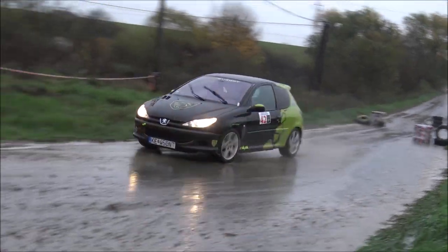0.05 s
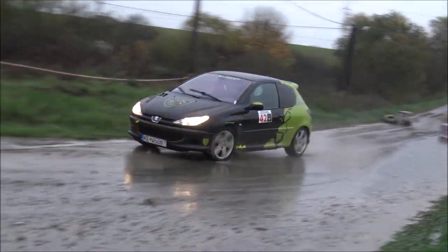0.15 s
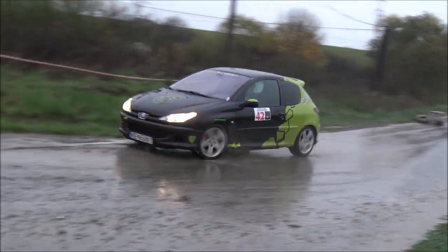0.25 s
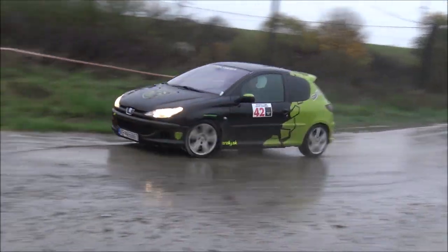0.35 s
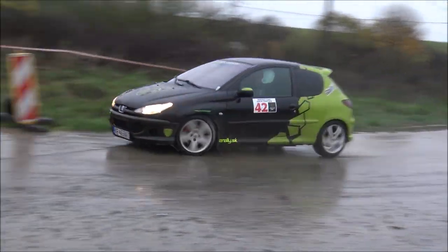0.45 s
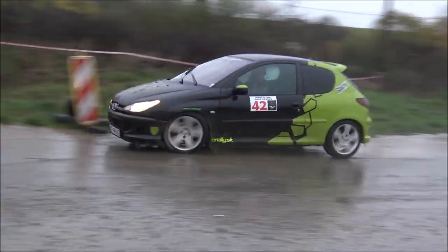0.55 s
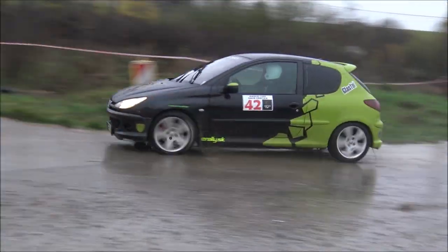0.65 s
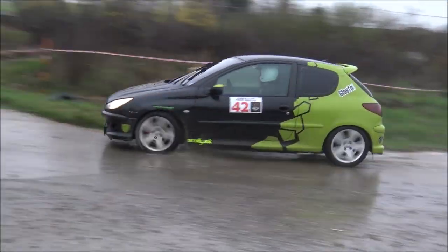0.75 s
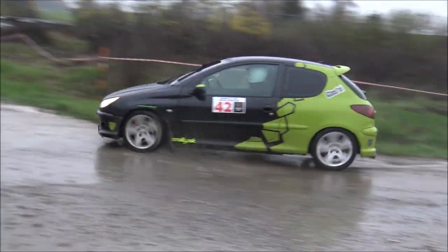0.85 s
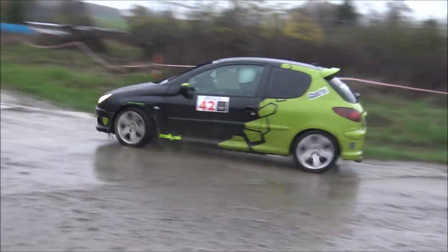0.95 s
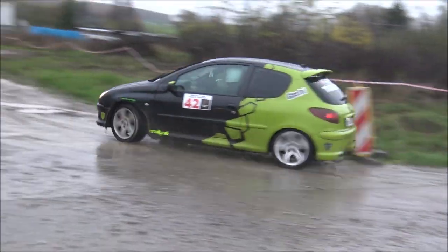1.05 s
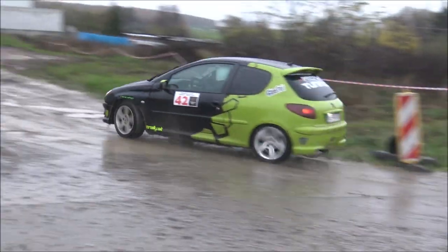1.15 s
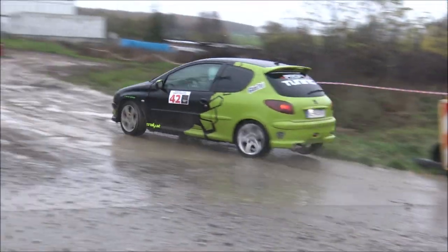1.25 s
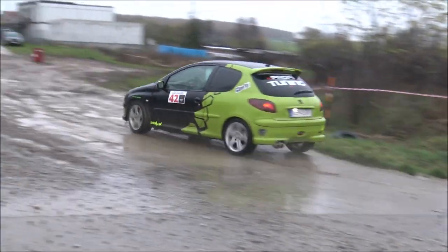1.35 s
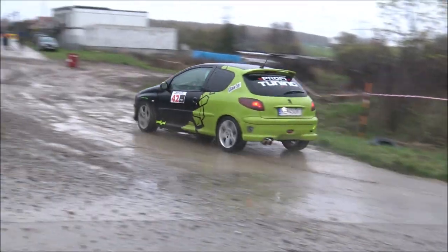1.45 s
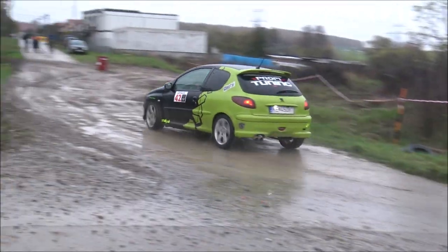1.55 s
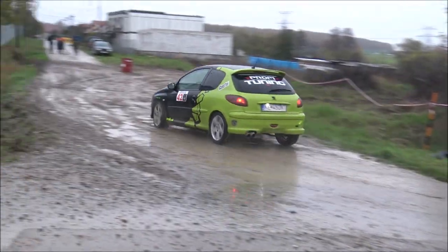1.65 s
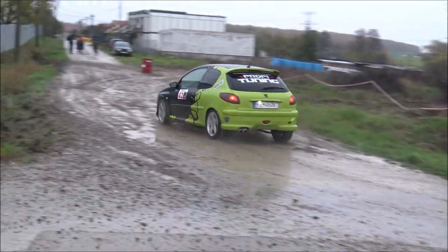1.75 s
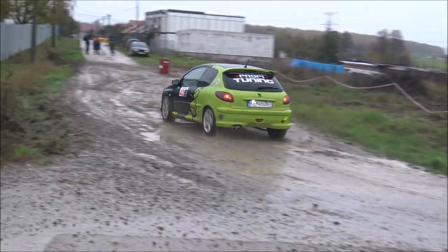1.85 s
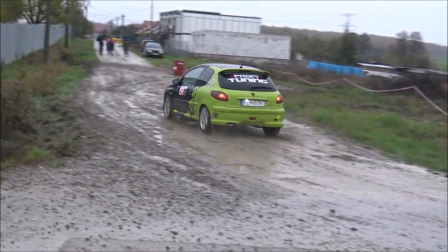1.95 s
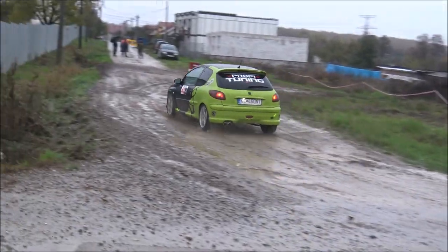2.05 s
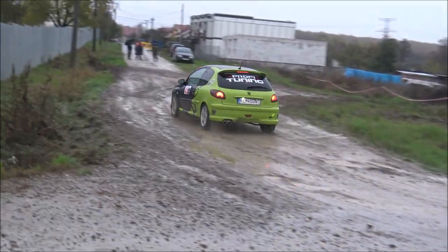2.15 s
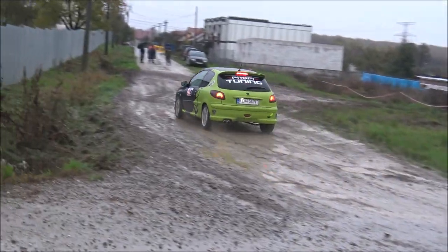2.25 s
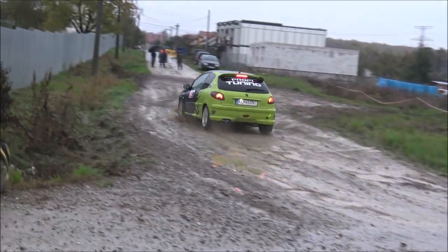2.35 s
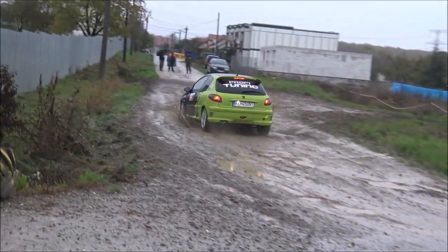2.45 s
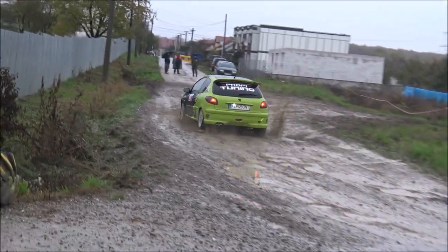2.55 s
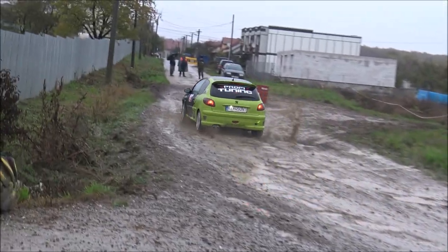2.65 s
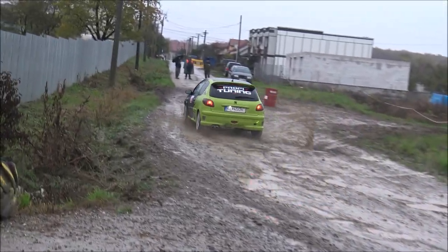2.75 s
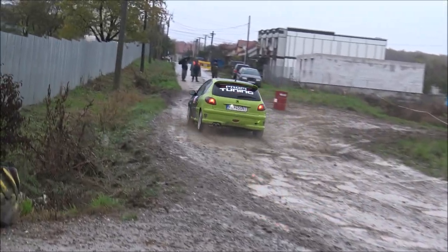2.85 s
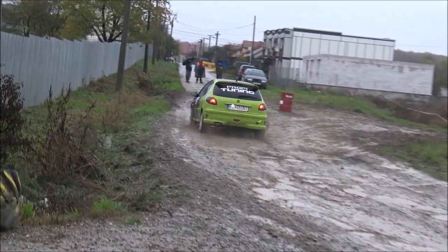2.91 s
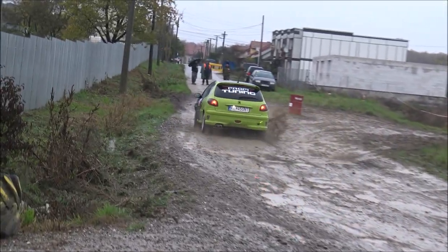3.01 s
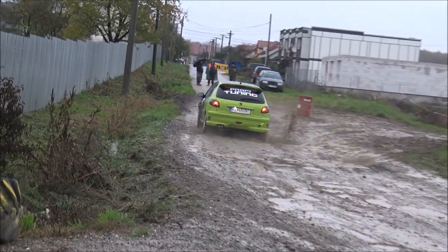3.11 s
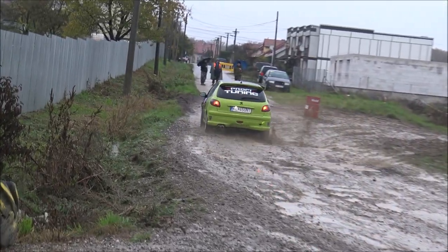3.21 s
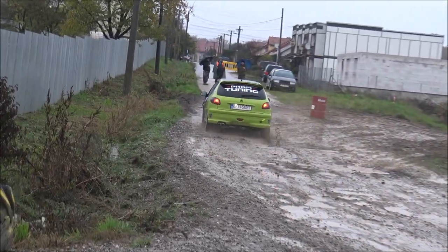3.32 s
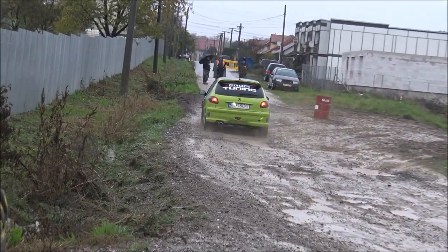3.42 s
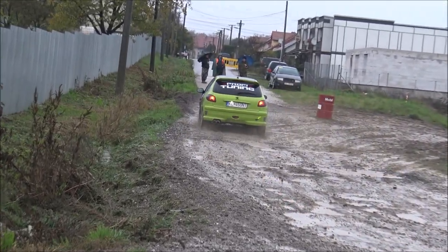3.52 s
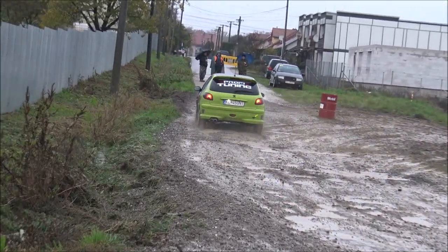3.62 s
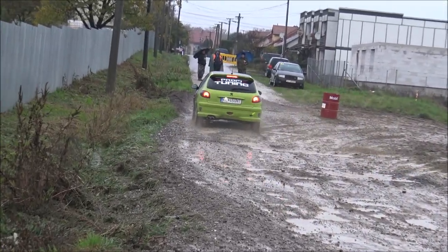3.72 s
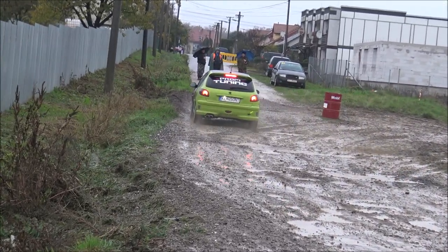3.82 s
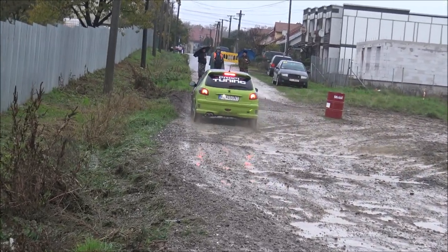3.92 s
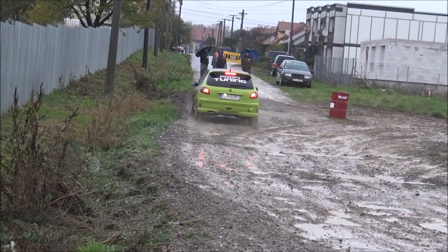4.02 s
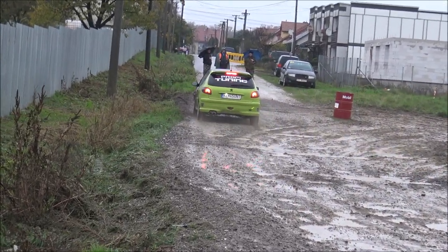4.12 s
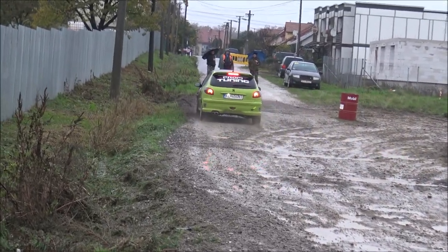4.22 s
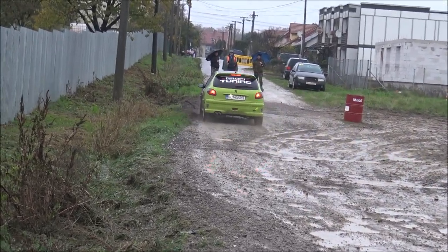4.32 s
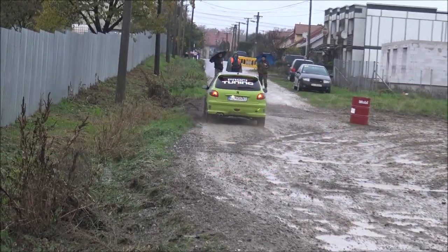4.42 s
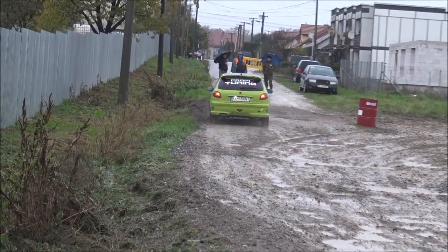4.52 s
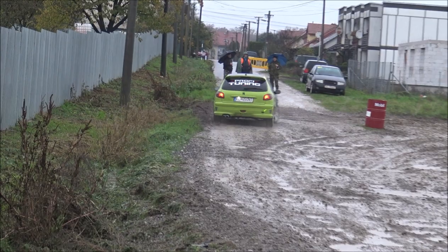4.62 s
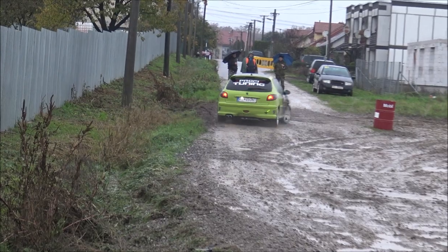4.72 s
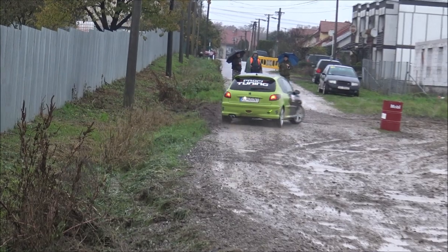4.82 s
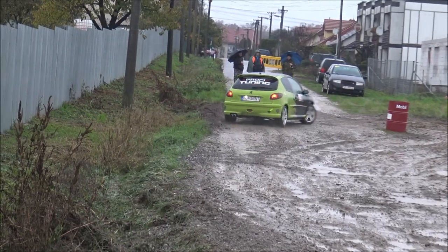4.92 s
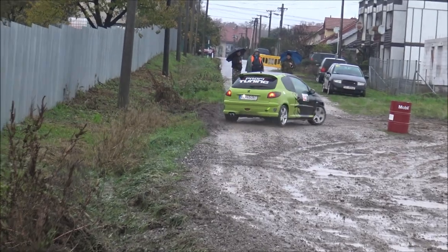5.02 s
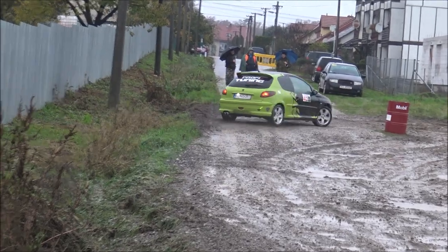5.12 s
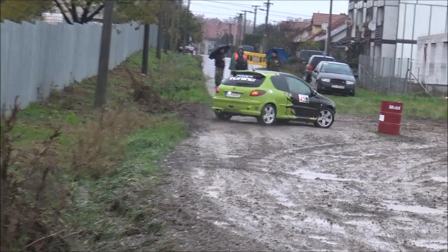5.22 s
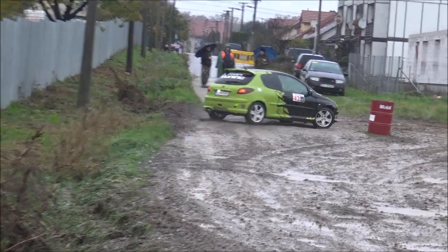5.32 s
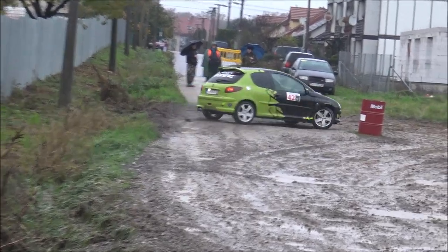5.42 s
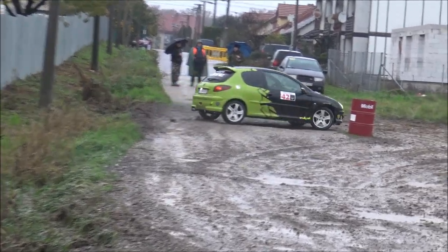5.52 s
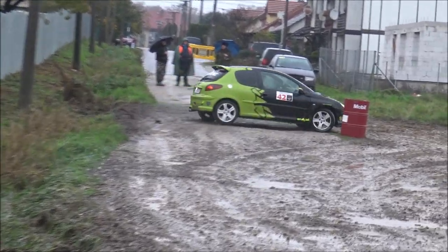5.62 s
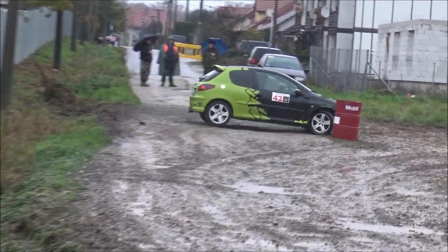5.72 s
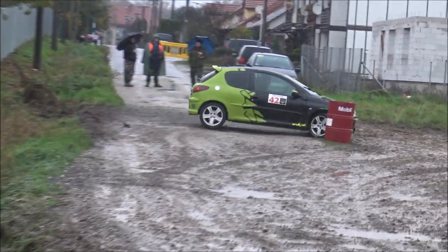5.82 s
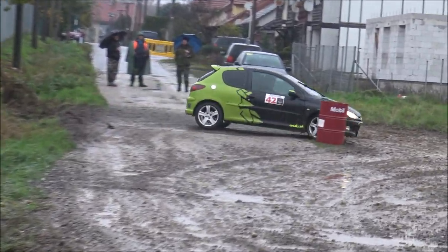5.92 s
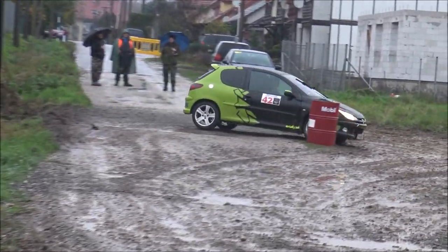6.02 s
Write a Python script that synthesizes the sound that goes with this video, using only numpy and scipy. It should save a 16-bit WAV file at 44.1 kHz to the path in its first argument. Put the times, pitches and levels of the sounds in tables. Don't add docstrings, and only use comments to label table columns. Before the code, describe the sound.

Buzzy four-cylinder engine boom and tyre spray sweep by and recede, the throttle lifts, and a crunchy, rattling gravel slide takes over.

```python
import sys
import numpy as np
from scipy import signal
from scipy.fft import rfft, irfft, next_fast_len
from scipy.io import wavfile
from scipy.ndimage import uniform_filter1d

SR = 44100
rng = np.random.default_rng(int(sys.argv[2]) if len(sys.argv) > 2 else 0)


def makeup_ratio(level_db):
    decades = np.asarray(level_db, float) / 20
    return 10 ** decades


def output_pcm(signal):
    pcm = np.clip(np.atleast_2d(signal).T, -1, 1) * 32767
    wavfile.write(sys.argv[1], SR, np.round(pcm).astype(np.int16))


N = 267238
T = np.arange(N) / SR


def unit(x):
    return x / np.sqrt(np.mean(x ** 2))


def colour(x, points):
    hz, db = np.transpose(points)
    size = next_fast_len(N)
    log_hz = np.log(np.arange(size // 2 + 1) * SR / size + 1)
    gain = makeup_ratio(np.interp(log_hz, np.log(hz), db))
    return irfft(rfft(x, size) * gain, size)[..., :N]


def ring(x, hz, width):
    return signal.lfilter(*signal.iirpeak(hz, hz / width, fs=SR), x)


def ring_twice(x, hz, width):
    return ring(ring(x, hz, width), hz, width)


def walk(rate):
    k = int(SR / rate)
    held = np.repeat(rng.standard_normal(N // k + 1), k)
    return 1.336 * uniform_filter1d(uniform_filter1d(held, k), k)[:N]


def swell(centre_s, length_s):
    return np.exp(-((T - centre_s) / length_s) ** 2)


def curves(rows):
    s, *columns = np.transpose(rows)
    return [np.interp(T, s, c) for c in columns]


def grains(rate, spread_db, hiss):
    chance, luck, sign = rng.random((3, N))
    size = makeup_ratio(np.minimum(-spread_db * np.log(luck + 1e-9), 15))
    tail = rng.standard_normal(60) * np.exp(-np.arange(60) / 12)
    impacts = (chance < rate / SR) * size * np.sign(sign - .5)
    hits = signal.fftconvolve(impacts, np.r_[2, .5 * tail])[:N]
    return unit(hits) + hiss * rng.standard_normal(N)


# start_s, peak_db, sign (1 or
RAINDROPS = [(3.2335, -32, 1), (4.4228, -40, -1), (4.5994, -38, 1), (4.6853, -34, -1), (5.4261, -26, 1),
             (5.6824, -26, -1), (5.9868, -30, 1)]


def raindrops():
    s, db, side = np.transpose(RAINDROPS)
    tick = np.zeros(N)
    tick[(s * SR).astype(int)] = makeup_ratio(db) * np.sign(side)
    burst = signal.lfilter([1], [1, -.95], tick) * rng.standard_normal(N)
    return colour(burst, [(2500, -25), (5000, 5), (9000, -1.0), (15000, -13)])


# start_s, end_s, pitch_hz, level_db
METAL_SQUEAL = (2.858, 2.905, 8750, -49)


def squeak():
    start, end, hz, db = METAL_SQUEAL
    fade = np.clip(np.minimum(T - start, end - T) / 0.0058, 0, 1)
    return makeup_ratio(db + 2 * walk(101.6)) * fade * np.sin(2 * np.pi * hz * T)


# start_s, level_db, boom_hz, upper_rings_db
RUT_THUDS = [(0.619, -18.5, 207, -10), (4.36, -35, 324, -3), (4.64, -20.5, 163.2, -15),
             (5.331, -16, 293, -21), (5.38, -19.5, 275, -13), (5.791, -27.5, 200, 1.5),
             (5.924, -30, 252, -3), (5.964, -13.5, 207, -7), (6.005, -24, 205, -9), (6.042, -24, 204.8, -3),
             (4.385, -27, 580, -30), (5.42, -20, 204, -25), (5.515, -26, 810, -32), (5.655, -21, 890, -30),
             (5.785, -28, 831, -25), (5.915, -32, 900, -30), (5.945, -29, 680, -20), (6.02, -27, 475, -25),
             (4.92, -24, 275, -25), (6.0, -26, 473, -25), (5.33, -32, 720, -30), (4.8, -25, 188, -30)]
# pitch_hz, width_hz, level_db
FLOOR_RINGS = [(479, 40, -2), (915, 90, -1)]


def thuds():
    out = np.zeros(N)
    decay = np.exp(-np.arange(8000) / SR / 0.044)
    for s, db, hz, upper_db in RUT_THUDS:
        push = makeup_ratio(db + 24.0) * decay * rng.standard_normal(8000)
        modes = [(hz, 36, 0)]
        modes += [(f, w, d + upper_db) for f, w, d in FLOOR_RINGS]
        boom = sum(makeup_ratio(d) * ring(ring(push, f, w), f, 2 * w) for f, w, d in modes)
        span = out[int(s * SR):][:8000]
        span += boom[:len(span)]
    return out


# start_s, peak_db
GRIT_TICKS = [(0.1575, -14), (1.1872, -20), (2.0717, -34), (3.716, -30), (4.3161, -30), (0.3381, -32),
              (0.7667, -18), (1.085, -34), (1.27, -32), (1.6279, -25), (2.209, -31), (2.286, -30),
              (3.023, -28), (3.2334, -32), (3.517, -27), (4.2386, -26), (4.4223, -22), (4.5442, -26),
              (4.564, -23), (4.5998, -23), (4.6853, -27), (4.7156, -21), (4.7893, -15), (5.4266, -23),
              (5.4924, -32), (5.5732, -28), (5.6411, -21), (5.683, -25), (5.7496, -13), (5.8775, -30),
              (5.899, -19), (5.9594, -18), (5.9868, -18), (6.0211, -21)]
# start_s, peak_db, pitch_hz
SILL_KNOCKS = [(.004, -22, 2290), (.05, -22, 2165), (.061, -16, 1800), (.071, -21, 2250), (.104, -26, 2100),
               (0.5776, -22, 1020), (4.0394, -17, 1510), (4.362, -17, 1310), (4.514, -20, 1573),
               (4.599, -9, 1360), (4.6199, -14, 2080), (4.6761, -6, 1320), (4.7376, -14, 1500),
               (4.7658, -9, 1576), (4.8444, -6, 1520), (5.5488, -10, 1530), (4.8298, -11, 1510),
               (4.865, -9, 1520), (4.884, -13, 1570), (5.072, -10, 2040), (5.1535, -14, 1600),
               (5.2211, -12, 1670), (5.3249, -11, 1270), (5.3908, -12, 1520), (5.4501, -9, 1520),
               (5.4925, -9, 1180), (5.5973, -14, 1560), (5.748, -13, 1560), (5.798, -9, 1000),
               (4.118, -16, 1550)]


def stones():
    s, db = np.transpose(GRIT_TICKS)
    tick = np.zeros(N)
    tick[(s * SR).astype(int)] = makeup_ratio(db)
    burst = signal.lfilter([1], [1, -.982], tick) * rng.standard_normal(N)
    bright = [(1500, -20), (4000, -1), (6000, 1), (8000, 2.5), (12000, -7.5), (16000, -18)]
    out = makeup_ratio(2.0) * colour(.5 * burst + 0.55 * tick, bright)
    age = np.arange(900) / SR
    for s, db, hz in SILL_KNOCKS:
        out[int(s * SR):][:900] -= makeup_ratio(db - 1.5) * np.exp(-age / .0025) * np.sin(2 * np.pi * hz * age)
    return out


# pitch_hz, width_hz, lift_db
PANEL_RINGS = [(705, 90, 3), (900, 110, 3), (1270, 120, 2), (1540, 80, 5), (2080, 200, 3)]


def panels(x):
    sideways = np.clip((T - 4.2) / .5, .25, 1)
    rings = sum((makeup_ratio(db) - 1) * makeup_ratio(1.4 * walk(20)) * ring(x, hz, w) for hz, w, db in PANEL_RINGS)
    return x + sideways * rings


# pitch_hz, level_db (per Hz)
MUD_TONE = [(30, -25), (50, -18), (110, -11.5), (160, -11), (185, 6.5), (212, -1), (245, -10), (280, -2.5),
            (370, -7.5), (600, -5.5), (900, -16), (1300, -48)]
# pitch_hz, level_db (per Hz)
GRAVEL_TONE = [(260, -53), (450, -21), (695, -5.5), (1050, -6), (1530, -4.5), (1830, -10), (2050, -9.5),
               (3200, -22.5), (4160, -30), (7040, -120)]
# pitch_hz, level_db (per Hz)
SPRAY_TONE = [(1100, -14.5), (1800, -6), (2400, -5), (3030, -5), (4200, -8), (5480, -12), (6630, -13),
              (9000, -16.5), (13800, -30.5), (15700, -39)]
# start_s, grit_db, water_db
THROWN_UP = [(0.0, -35, -34), (0.15, -38, -37), (0.35, -39.5, -38), (0.74, -36.5, -36.5),
             (0.89, -47, -37.5), (0.93, -41, -43), (1.28, -39, -42), (1.6, -35.5, -38), (1.86, -42.5, -48),
             (2.2, -42.5, -42), (2.73, -35.5, -41.5), (3.78, -32.5, -40.5), (4.3, -32.5, -40),
             (4.66, -30, -40.5), (4.79, -21.5, -31.5), (5.05, -21.5, -32), (5.5, -21.5, -32.5),
             (6.06, -25.5, -35)]
# centre_s, length_s, grit_db, water_db
THROW_SURGES = [(1.659, 0.041, -2, 3), (4.615, 0.013, 0.5, 0), (4.78, 0.015, 0.5, -0.5), (4.864, 0.035, 1, -1),
                (5.022, 0.073, 1.5, 2), (1.994, 0.06, 5, 1.5), (3.11, 0.024, -5, 3.5), (4.046, 0.037, 4.5, 0),
                (4.226, 0.036, -2, 1.5), (4.372, 0.025, 6, 1), (4.69, 0.012, 4, 1), (4.822, 0.0087, -4, -5),
                (5.155, 0.016, 0, -2.5), (5.3, 0.039, 2, 2.5), (5.55, 0.037, 2.5, -0.5), (5.755, 0.061, 1, 3),
                (5.89, 0.04, -3.5, -2.5), (6, 0.02, -2.5, 0), (5.195, 0.038, 0.5, -2), (5.25, 0.018, 1, 0),
                (5.436, 0.034, -0.5, 0.5), (5.63, .03, 1.5, -1.5), (5.7, .025, -0.5, -1),
                (5.806, .015, 1.5, 0.5), (5.843, 0.019, 0.5, -3), (4.934, .025, 0, 0), (5.11, .02, 3, 0.5),
                (5.942, .02, -0.5, 3.5), (.77, .02, -2, 1), (0.585, .015, 3, 1)]
# start_s, level_db (above 11 kHz)
DISTANCE_LOSS = [
    (0, 5),
    (1.65, 0.5),
    (1.85, -2),
    (6.06, -4),
]
MUD_DB, MUD_PER_GRIT, MUD_PER_WATER, MUD_PER_BOOM = -29.5, 0.24, 0.26, 0.091
MIST_DB, MIST_DB_PER_S = -5, -1.45
BRAKING_S, BRAKING_LENGTH_S, BRAKING_DB, MUD_BRAKING_DB = 4.65, 0.25, -7, -5
SCRAPE_S, SCRAPE_LENGTH_S, SCRAPE_HZ, SCRAPE_WIDTH_HZ, SCRAPE_DB = .06, 0.041, 1980, 800, -39
RUMBLE_S, RUMBLE_HZ, RUMBLE_WIDTH_HZ, RUMBLE_DB = 4.96, 95, 67, -37.5


def tyres():
    gravel_db, spray_db = curves(THROWN_UP)
    boom_db = np.where(T < LIFT_S, curves(THROTTLE_LOAD)[0], -30)
    mud_db = MUD_DB + MUD_PER_GRIT * (gravel_db + 36.5) + MUD_PER_WATER * (spray_db + 39.5)
    mud_db = mud_db + MUD_PER_BOOM * (boom_db + 18)
    for s, length, grit_db, water_db in THROW_SURGES:
        jolt = swell(s, length)
        gravel_db = gravel_db + grit_db * jolt
        spray_db = spray_db + water_db * jolt
    braking = swell(BRAKING_S, BRAKING_LENGTH_S)
    mud_db = mud_db + MUD_BRAKING_DB * braking
    mist_db = spray_db + MIST_DB + MIST_DB_PER_S * T

    ruts = walk(28)
    mud = unit(colour(rng.standard_normal(N), MUD_TONE))
    mud = mud * makeup_ratio(mud_db + 0.6 * ruts + 2.03 * walk(12))

    grit = panels(colour(grains(1600, 5, 0.96), GRAVEL_TONE))
    arch = colour(grit, [(1000, 0), (1150, -30)])
    above_arch = grit - arch
    gravel = unit(arch * makeup_ratio(1.2 * walk(25) + BRAKING_DB * braking) + above_arch * makeup_ratio(1.2 * walk(40)))

    water = colour(grains(1200, 4.2, 1.6) * makeup_ratio(0.6 * ruts + 0.95 * walk(60)), SPRAY_TONE)
    low = colour(water, [(5500, 0), (8500, -30)])
    top = colour(water, [(9500, -30), (12500, 0)])
    flash = 1 + .5 * (walk(900) > 2.3)
    air_gain = makeup_ratio(curves(DISTANCE_LOSS)[0] + 1.5 * walk(40))
    mist = water - low + flash * top * (air_gain - 1)

    skim = swell(SCRAPE_S, SCRAPE_LENGTH_S) * makeup_ratio(SCRAPE_DB)
    scrape = skim * unit(ring_twice(water, SCRAPE_HZ, SCRAPE_WIDTH_HZ))
    sliding = np.clip((T - RUMBLE_S) / 0.44, 0, 1)
    drum = unit(ring_twice(rng.standard_normal(N), RUMBLE_HZ, RUMBLE_WIDTH_HZ))
    rumble = sliding * makeup_ratio(RUMBLE_DB) * drum

    sideways = np.clip((T - 4.7) / .1, 0, 1) * np.clip((5.83 - T) / .02, 0, 1)
    low = low + 0.38 * sideways * ring(water, 6500, 640)

    out = mud + scrape + rumble
    out = out + gravel * makeup_ratio(gravel_db + 0.6 * ruts)
    return out + unit(low) * makeup_ratio(spray_db + 3.5) + unit(mist) * makeup_ratio(mist_db + 3.0)


# start_s, turns_hz
CLIMB_REVS = [(0.0, 95.7), (0.23, 91.24), (0.53, 89.64), (0.61, 81.6), (0.73, 84.3), (0.91, 82.8),
              (1.06, 89.3), (1.21, 85.4), (1.36, 87.14), (1.71, 87.9), (2.01, 97.76), (2.12, 91),
              (2.25, 93.7), (2.5, 89.9), (2.72, 89.86), (2.95, 92.7), (3.04, 83.8), (3.5, 88.8)]
# start_s, turns_hz, level_db
COAST_DOWN = [
    (3.851, 87.6, -5),
    (3.9, 84.6, 3.5),
    (4.01, 77.4, 2.5),
    (4.14, 74.97, 2.5),
    (4.22, 71.4, 3),
    (4.33, 58.77, 1.5),
    (4.54, 45.24, -4),
    (4.67, 43.7, -5.5),
    (4.78, 42.64, -0.5),
]
# start_s, boom_db, bark_db, uneven_db (odd orders), aim_db (per order, pipe toward us)
THROTTLE_LOAD = [(0, -11.5, -37, 6.5, 1.7), (0.16, -10, -32, 1, -3.5), (0.41, -13, -26.5, -6, -1.6),
                 (0.56, -15.5, -27.5, -0.5, -0.2), (0.62, -22, -26.5, 3.5, 1.3),
                 (0.75, -14.5, -22, -4, 0.3), (0.92, -21, -21, -7, 0), (1.06, -16.5, -25.5, 1, 0.6),
                 (1.25, -19.5, -23.5, -0.5, -0.2), (1.66, -9.5, -26.5, -7.5, -3),
                 (1.89, -16.5, -29, 8.5, 0.2), (2.01, -13, -28, 9, -0.7), (2.29, -14, -27.5, -2, -2.5),
                 (2.42, -21.5, -39, 4, -3.5), (2.95, -21.5, -36.5, 0, -5), (3.35, -22, -39.5, 4, -2),
                 (3.5, -15.5, -29.5, 4.5, -2.5), (3.86, -18, -27.5, 1, -2.5)]
BARK_ORDERS_DB = [-.5, -3, 2, -0.5, -2]
# pitch_hz, level_db
PIPE_TONE = [(48, -41), (84, -46), (105, -36), (140, -39.5), (180, -27), (225, -45), (340, -35),
             (430, -43.5), (505, -37.5), (600, -47)]
# pitch_hz, level_db (against order 8)
SILENCER_TONE = [(500, -17), (750, -10.5), (850, -7), (1000, -13), (1100, -20.5), (1300, -16.5),
                 (1700, -73)]
# centre_s, length_s, order, lift_db
ORDER_SWELLS = [(0.11, 0.13, 5, -26), (0.2, 0.11, 8, -12), (.16, 0.051, 6, -12), (0.64, 0.48, 1, 11),
                (0.646, 0.059, 5, 7.5), (0.65, 0.074, 3, -18), (0.78, 0.12, 6, -13),
                (.85, 0.16, 11, -11), (1.196, 0.1, 7, -8.5), (1.08, .07, 4, -2.5),
                (1.45, 0.25, 1, -9), (1.52, 0.18, 7, 7), (1.7, 0.076, 8, 6), (1.773, 0.21, 1, 9.5),
                (2, .1, 3, 10.5), (1.925, 0.15, 10, 11), (2.64, .25, 3, -13), (2.87, 0.15, 4, 4.5),
                (3.068, 0.05, 4, -9.5), (3.258, 0.16, 6, 11), (3.27, 0.19, 1, -15),
                (3.52, 0.26, 8, -15), (3.68, 0.29, 5, -4.5), (3.69, 0.16, 7, 5.5),
                (4.5, 0.097, 6, -9), (3.96, 0.053, 2, 7), (4.39, 0.061, 6, 8.5),
                (3.4, 0.033, 5, -14), (1.32, 0.096, 8, 3), (4.54, 0.15, 1, 6), (.6, 0.0094, 2, 5),
                (.625, .012, 2, -1), (0.76, 0.015, 2, -2), (0.78, 0.0056, 2, -17),
                (0.65, 0.0072, 2, -3), (.62, 0.035, 7, -4), (4.2, 0.023, 5, 7.5), (4.2, 0.036, 7, 8),
                (4.28, 0.018, 5, 4.5), (3.7, 0.025, 8, 3), (4.64, 0.03, 4, 3), (4.55, 0.043, 7, 8),
                (3.98, 0.045, 4, 8), (3.4, 0.052, 7, -1), (1.38, 0.35, 9, 7.5), (2.3, .08, 3, 8),
                (0.068, 0.031, 7, 4), (0.25, .1, 3, 2), (4.48, 0.052, 10, 15), (.85, .15, 13, -8),
                (1.55, .2, 8, 3), (.3, .15, 4, -2), (2.0, .08, 5, 2)]
FIRST_DB, FIRST_SHARE, THIRD_DB, THIRD_SHARE = -30, 0.25, -8, 0.6
DRIFT_DB, DRIFT_PER_S = 1, 6
LIFT_S = 3.875
FIRING_DB = 4
HOP_S, HOP_LENGTH_S, HOP_PER_S, HOP_DEPTH = 3.585, 0.174, 4.88, 0.015
MISFIRE_S, MISFIRE_LENGTH_S, MISFIRE_DB = .581, 0.01, -9.5


def climb():
    hz, = curves(CLIMB_REVS + [row[:2] for row in COAST_DOWN])
    hop = np.exp(-((T - HOP_S) / HOP_LENGTH_S) ** 4) * np.cos(2 * np.pi * HOP_PER_S * (T - HOP_S))
    hz = hz * (1 - HOP_DEPTH * hop)

    boom, bark, uneven, aim = curves(THROTTLE_LOAD)
    loaded = [boom + FIRST_DB + FIRST_SHARE * uneven, boom, bark + THIRD_DB + THIRD_SHARE * uneven]
    for k, shape_db in enumerate(BARK_ORDERS_DB, 4):
        loaded.append(bark + shape_db + aim * (k - 6) + k % 2 * uneven)

    shut = np.clip((T - LIFT_S) / 0.015, 0, 1)
    coast_db = curves(COAST_DOWN)[1]
    pipe_hz, pipe_db = np.transpose(PIPE_TONE)
    db = []
    for k, on_db in enumerate(loaded, 1):
        off_db = coast_db + np.interp(np.log(k * hz), np.log(pipe_hz), pipe_db) + FIRING_DB * (k == 2)
        drift = (k != 2) * DRIFT_DB * walk(DRIFT_PER_S)
        db.append(on_db + shut * (off_db - on_db) + drift)
    top = db[-1].copy()
    for k in range(9, 19):
        db.append(top + np.interp(k * hz, *np.transpose(SILENCER_TONE)) + 1.4 * walk(5.27))

    for s, length, order, lift_db in ORDER_SWELLS:
        db[round(order) - 1] += lift_db * swell(s, length)
    miss = MISFIRE_DB * swell(MISFIRE_S, MISFIRE_LENGTH_S)
    return hz, [level_db + miss for level_db in db], top


def orders(hz, db, top, s, rough, jitter):
    phase = 2 * np.pi * np.cumsum(hz * (1 + jitter * walk(45))) / SR
    on = np.clip(np.minimum(T - s[0] + .03, s[-1] + .03 - T) / .03, 0, 1)
    out = 0
    for k, level_db in enumerate(db, 1):
        uneven = 1 + rough * min(k / 4, 3) * np.clip(86 / hz, 1, 1.4) * walk(60)
        lag = 0 if k == 2 else .85 * (k - 4) - .06 * (k - 4) ** 2 - 3 + .85 * walk(4)
        out = out + uneven * np.sqrt(2) * makeup_ratio(level_db) * np.cos(k * phase - lag)
    return on * out, phase, on * makeup_ratio(top)


# start_s, turns_hz, boom_db
SLIDE_SPIN = [
    (4.84, 93.75, -45),
    (4.954, 88.07, -21.5),
    (5.062, 86.3, -24.5),
    (5.178, 78.06, -31),
    (5.422, 76, -32.5),
    (5.524, 82.04, -31),
    (5.7, 81.8, -31.5),
    (5.778, 78.1, -31.5),
    (6.06, 75.2, -35),
]
SPIN_ORDERS_DB = [-14.5, 0.6, -5.5]
CRACK_S, CRACK_LENGTH_S, CRACK_DB = 1.974, 0.074, -37.5


def engine():
    pipe, phase, bark = orders(*climb(), (0, COAST_DOWN[-1][0]), 0.12, 0.0045)

    hz, boom = curves(SLIDE_SPIN)
    span = SLIDE_SPIN[0][0], SLIDE_SPIN[-1][0]
    spin_db = [boom + db + 1.5 * walk(9) for db in SPIN_ORDERS_DB]
    spin = orders(hz, spin_db, boom, span, .9, .03)[0]

    half = sum(np.cos((k + .5) * phase + k) * (1 + .5 * walk(24.0)) for k in range(1, 9))
    from_puff = np.cos(phase - .75) - 1
    puff = np.exp(2.7 * from_puff) * rng.standard_normal(N)
    gas = colour(puff, [(500, -24), (1200, 13.5), (2500, -23), (5000, 0), (16000, -53)])

    crack_tone = [(1000, -28), (1250, 3), (2000, -7), (2800, -5), (4000, -30)]
    crack = unit(colour(np.exp(300 * from_puff), crack_tone))
    crack = crack * makeup_ratio(CRACK_DB + 3.2 * walk(60.1)) * swell(CRACK_S, CRACK_LENGTH_S)
    return crack + pipe + spin + bark * (makeup_ratio(-14.0) * half + makeup_ratio(-16.5) * unit(gas))


GROUND_HZ, GROUND_WIDTH_HZ, GROUND_SHARE, GROUND_UNTIL_S = 1100, 90, .75, 2.5


def scene():
    car = engine() + tyres() + stones() + thuds() + squeak()
    near = np.clip(T / .2, 0, 1) * np.clip(GROUND_UNTIL_S - T, 0, .5) * 2
    car = car - GROUND_SHARE * near * ring(car, GROUND_HZ, GROUND_WIDTH_HZ)
    tail = rng.standard_normal(9000) * np.exp(-np.arange(9000) / 1200.)
    echo = makeup_ratio(-24) * signal.fftconvolve(car, tail / np.linalg.norm(tail))[:N]
    echo = colour(echo, [(60, 11), (150, -9), (800, -1), (1700, -1),
                         (3000, -6), (4800, -8), (6400, 3), (8500, -8)])
    side = echo + raindrops()
    return np.array([car + side, car - side])


def roll_off(x):
    return signal.sosfilt(signal.butter(12, 15870, fs=SR, output="sos"), x)


# pitch_hz, level_db
CAPSULE_DIFFERENCE = [(60, 2.5), (110, 2.0), (200, 1.0), (380, -3.5), (700, -2.0), (1290, -0.3),
                      (2380, 0.0), (15000, 0.0)]
TOP_HZ = 15800


def record(dry):
    hz, db = np.transpose(CAPSULE_DIFFERENCE)
    left = colour(dry[0], np.transpose([hz, db / 2]))
    right = colour(dry[1], np.transpose([hz, -db / 2]))
    rounded = np.tanh(.7 * np.array([left, right])) / .7
    mix = colour(rounded, [(TOP_HZ, 0), (TOP_HZ + 80, -90)])
    return roll_off(mix)


dry = scene()
out = record(dry)
output_pcm(out)
```